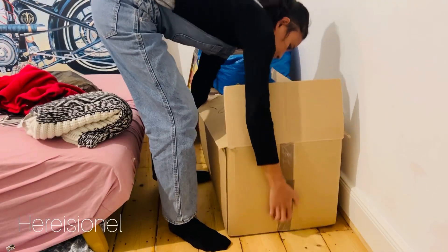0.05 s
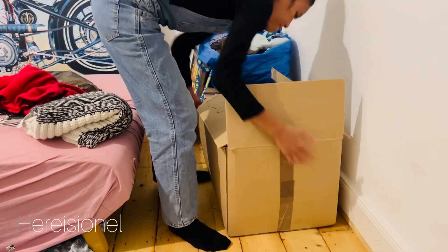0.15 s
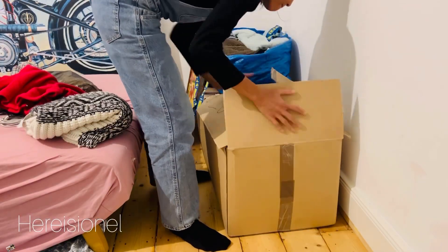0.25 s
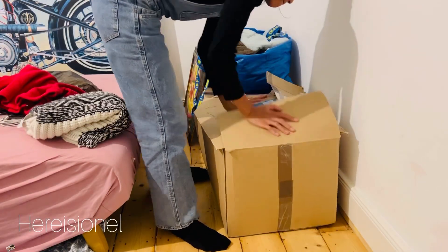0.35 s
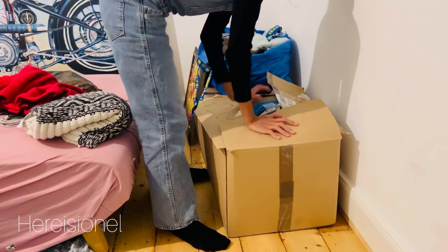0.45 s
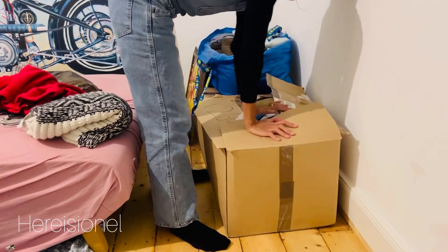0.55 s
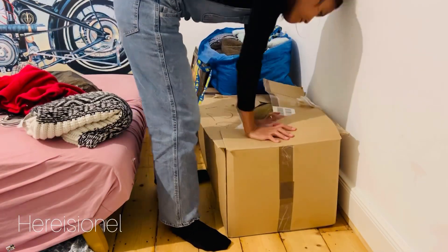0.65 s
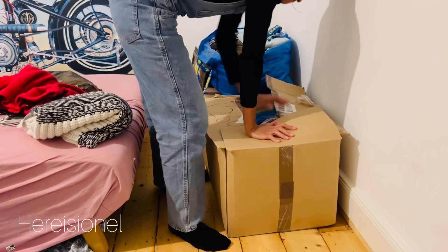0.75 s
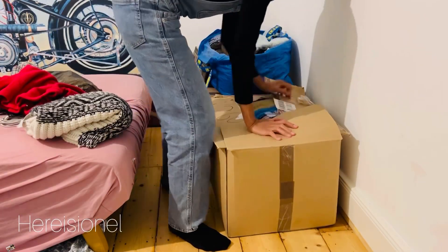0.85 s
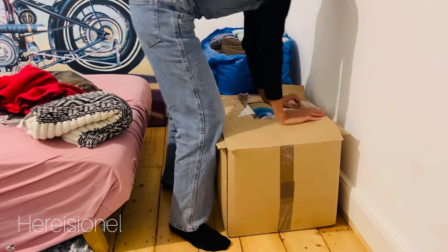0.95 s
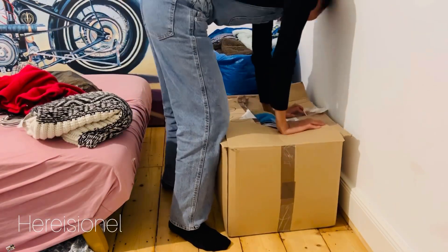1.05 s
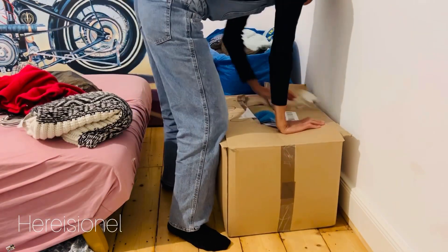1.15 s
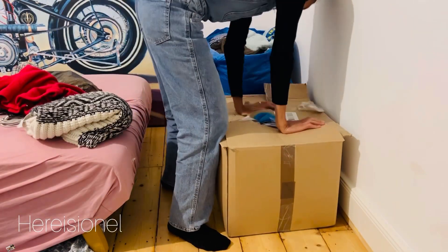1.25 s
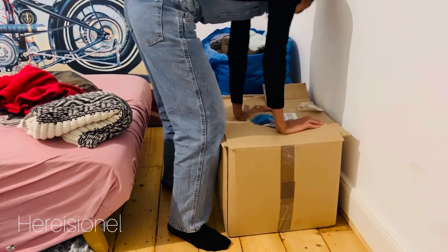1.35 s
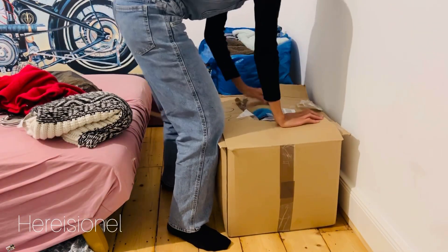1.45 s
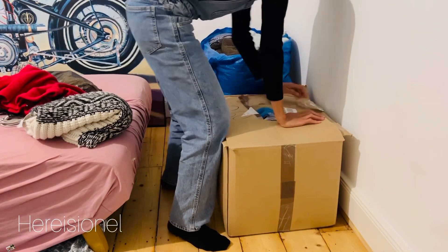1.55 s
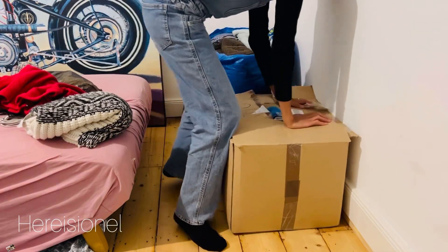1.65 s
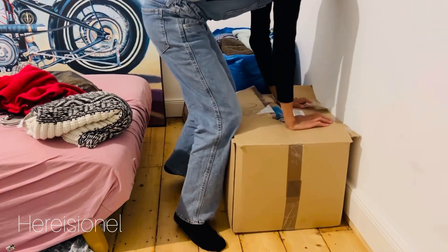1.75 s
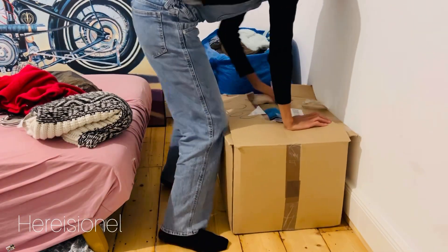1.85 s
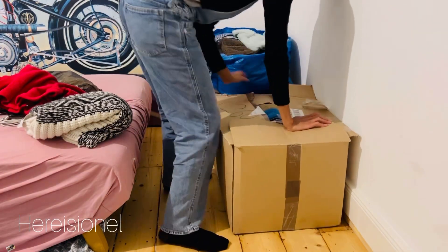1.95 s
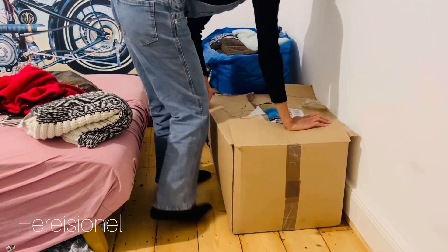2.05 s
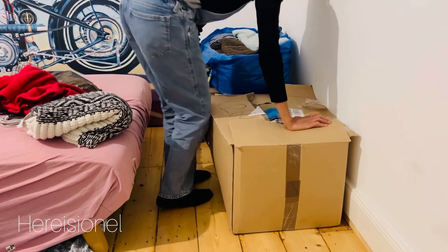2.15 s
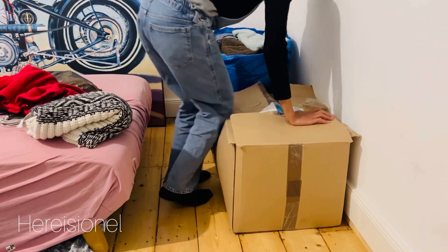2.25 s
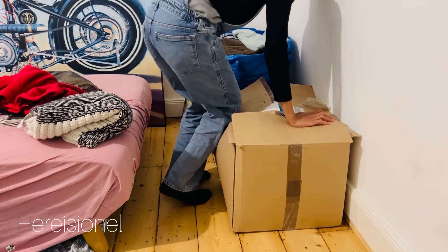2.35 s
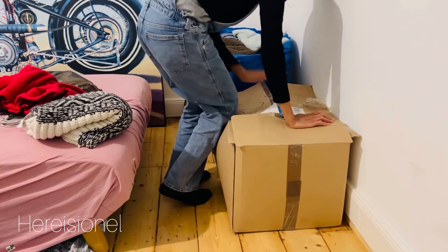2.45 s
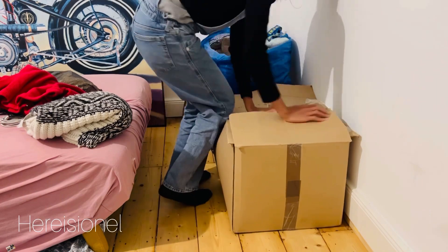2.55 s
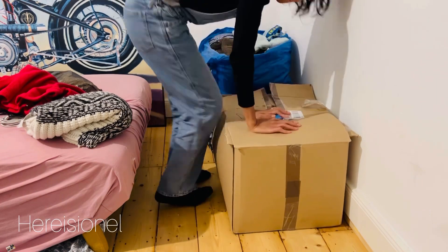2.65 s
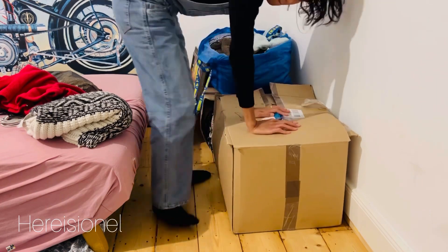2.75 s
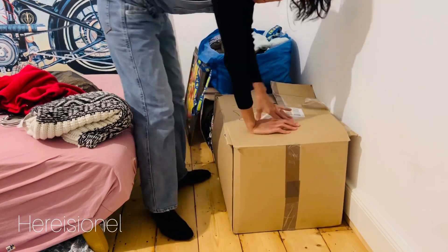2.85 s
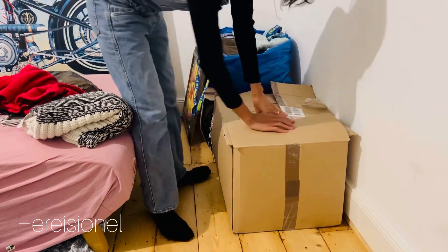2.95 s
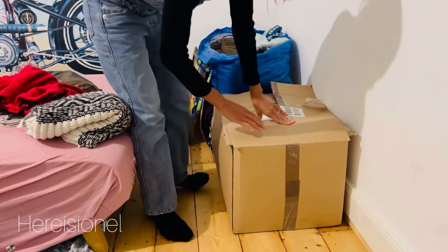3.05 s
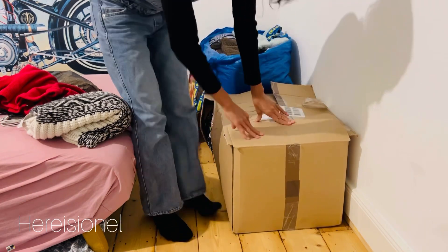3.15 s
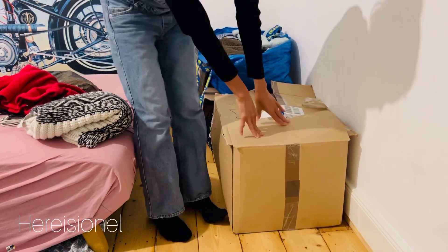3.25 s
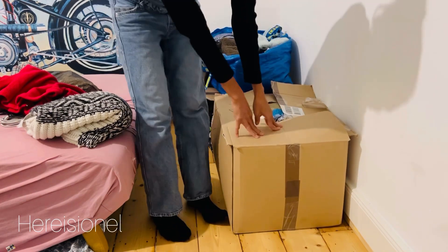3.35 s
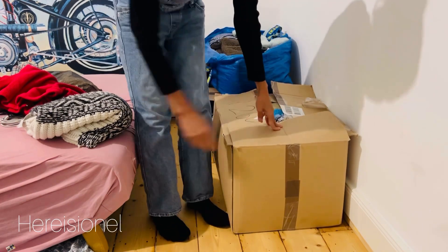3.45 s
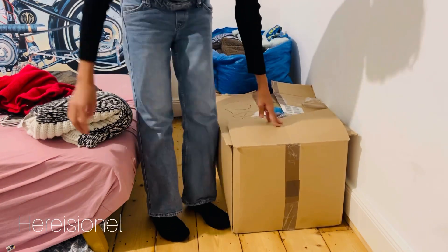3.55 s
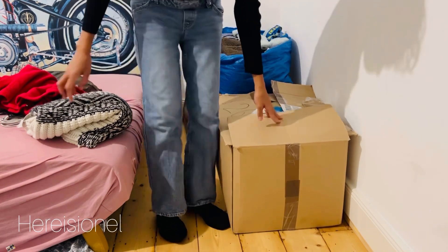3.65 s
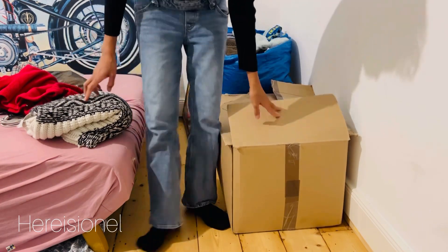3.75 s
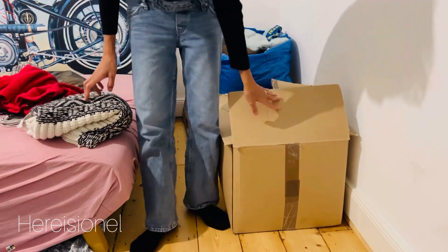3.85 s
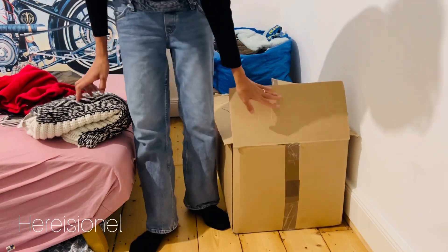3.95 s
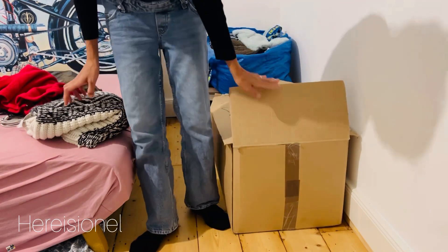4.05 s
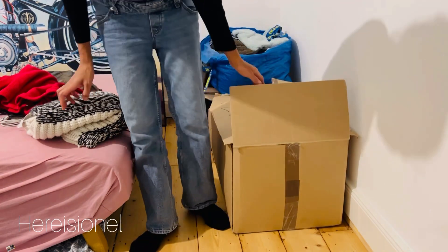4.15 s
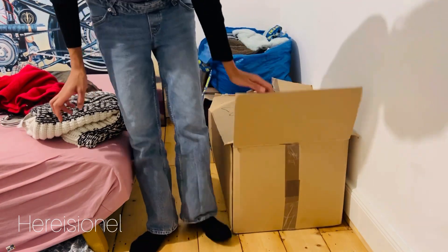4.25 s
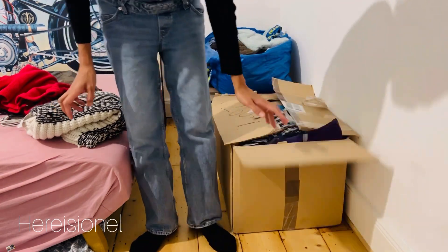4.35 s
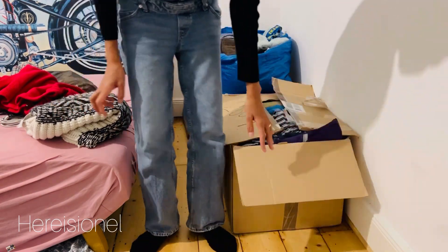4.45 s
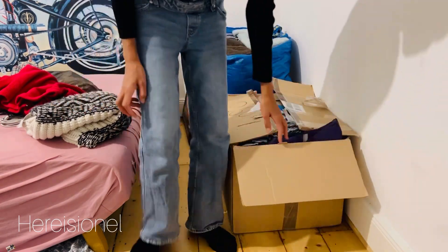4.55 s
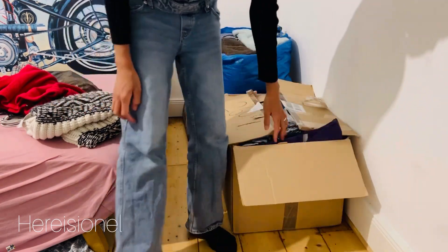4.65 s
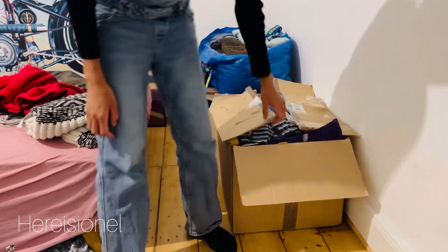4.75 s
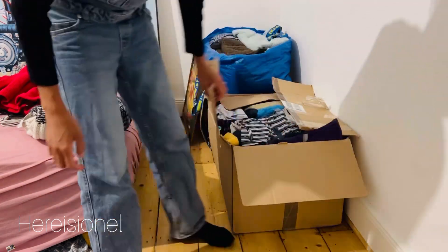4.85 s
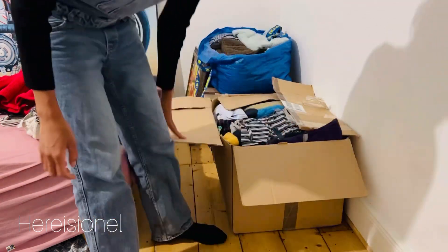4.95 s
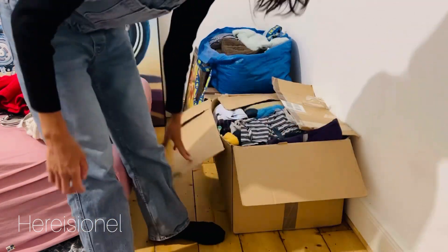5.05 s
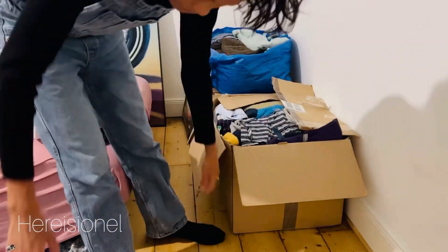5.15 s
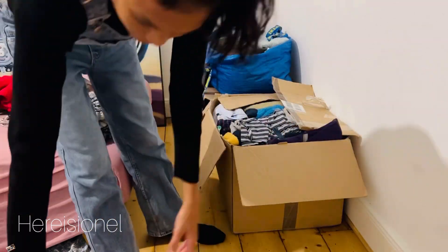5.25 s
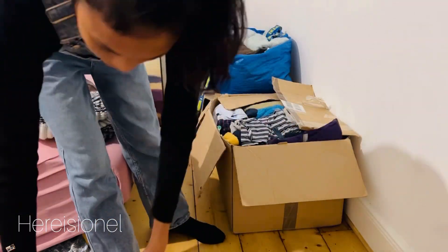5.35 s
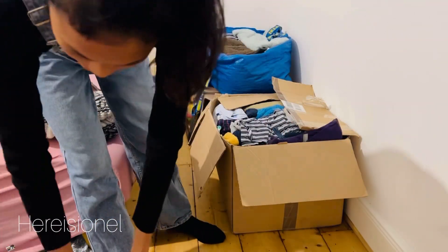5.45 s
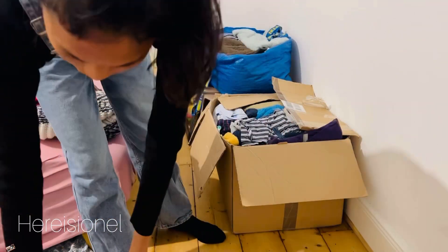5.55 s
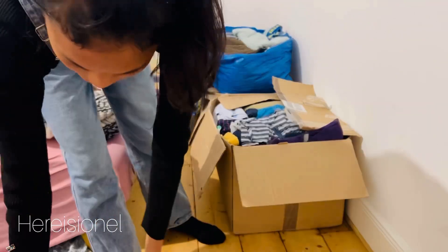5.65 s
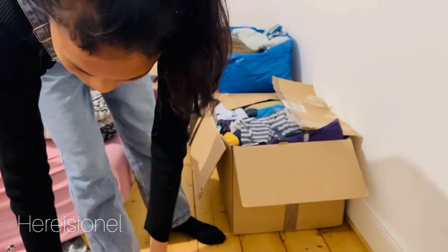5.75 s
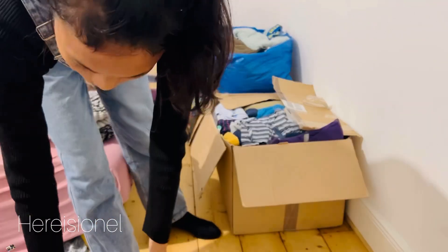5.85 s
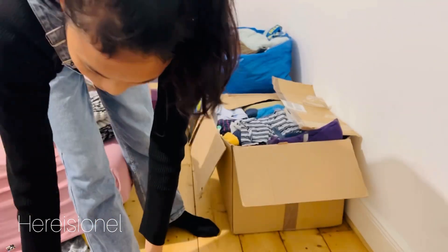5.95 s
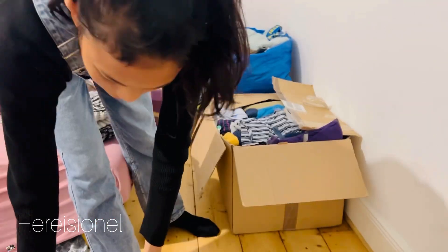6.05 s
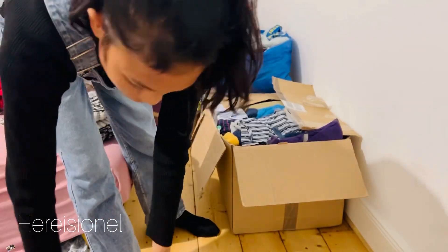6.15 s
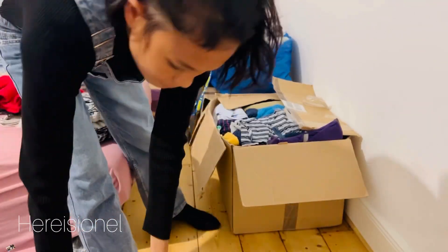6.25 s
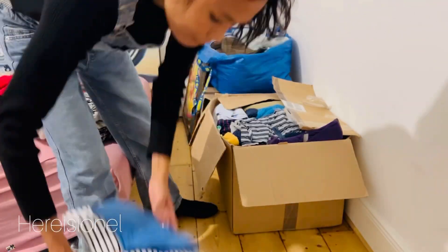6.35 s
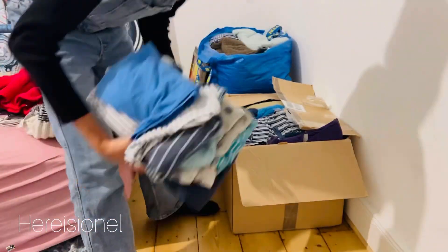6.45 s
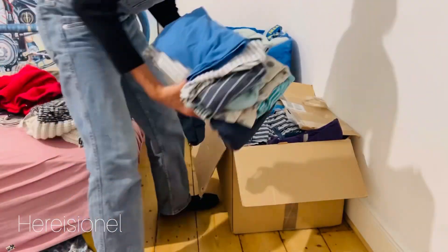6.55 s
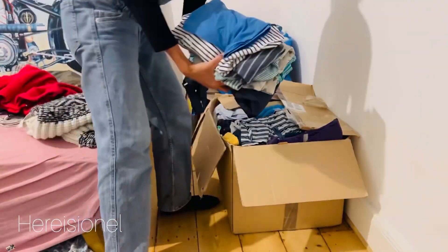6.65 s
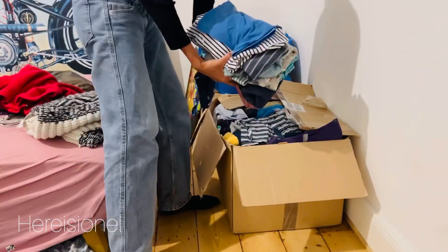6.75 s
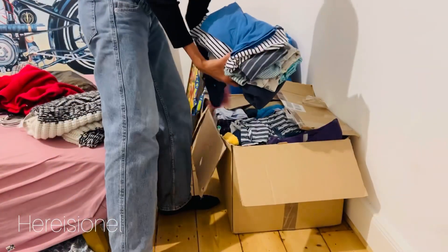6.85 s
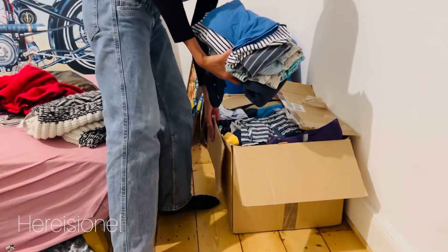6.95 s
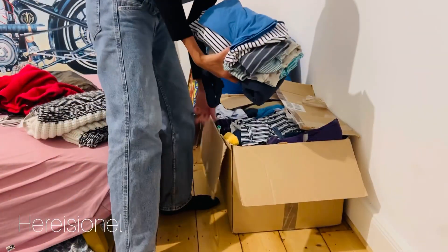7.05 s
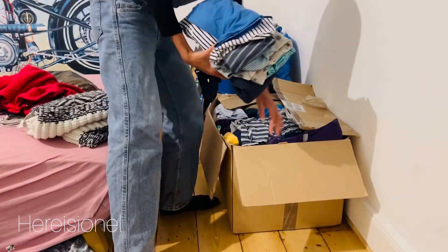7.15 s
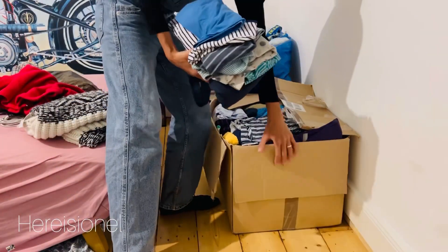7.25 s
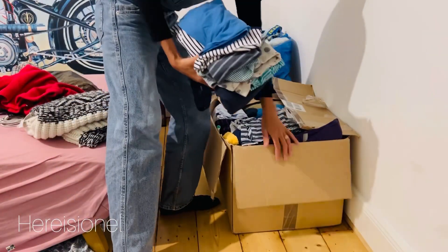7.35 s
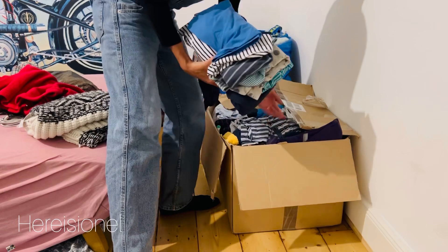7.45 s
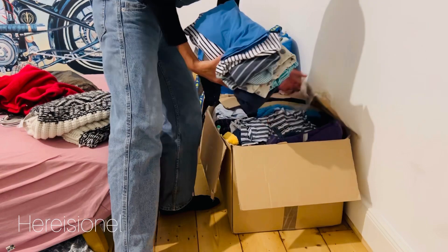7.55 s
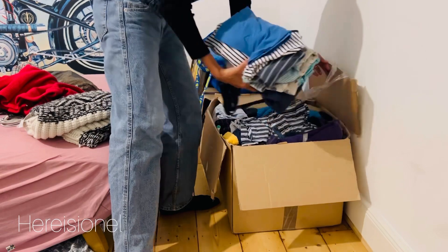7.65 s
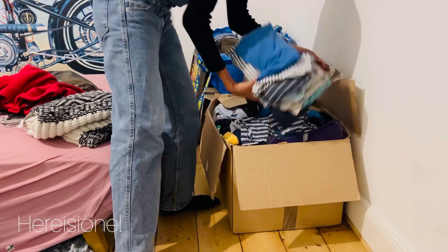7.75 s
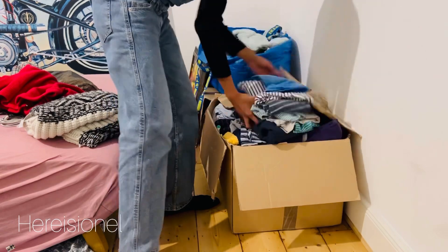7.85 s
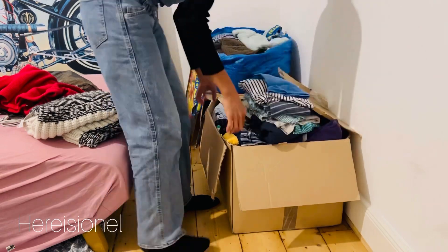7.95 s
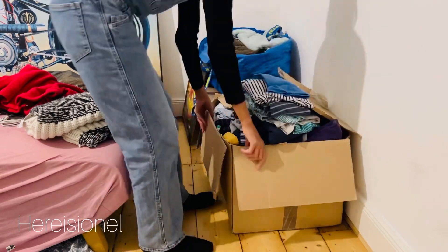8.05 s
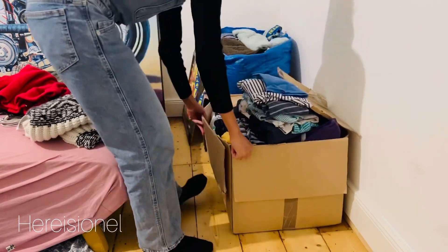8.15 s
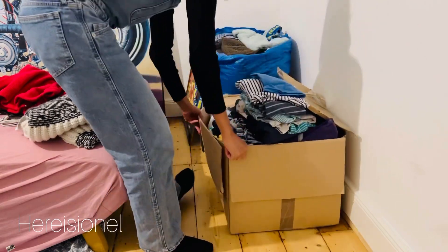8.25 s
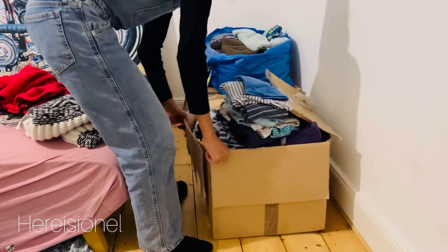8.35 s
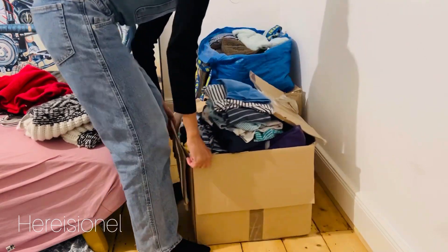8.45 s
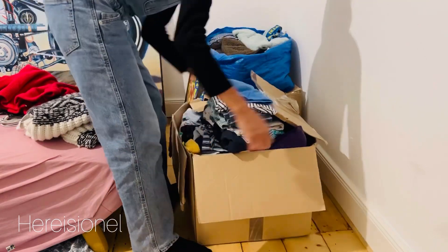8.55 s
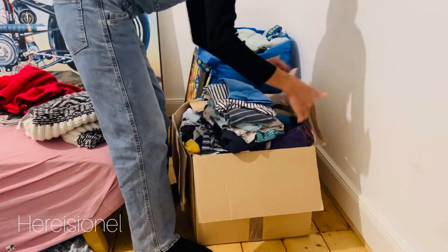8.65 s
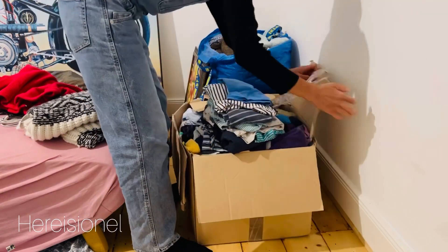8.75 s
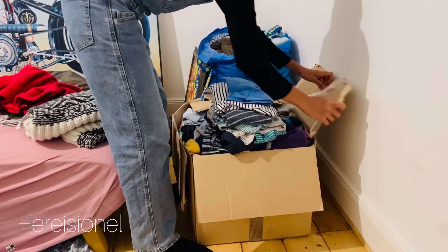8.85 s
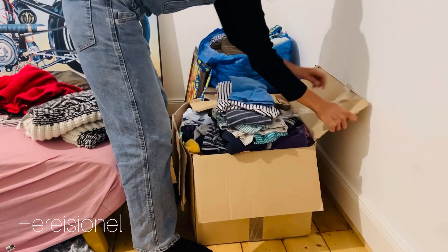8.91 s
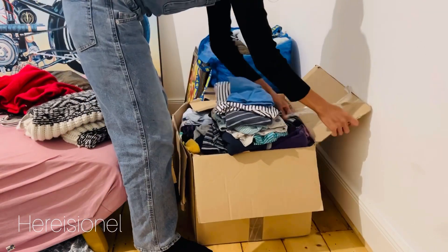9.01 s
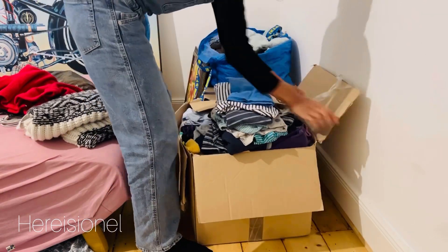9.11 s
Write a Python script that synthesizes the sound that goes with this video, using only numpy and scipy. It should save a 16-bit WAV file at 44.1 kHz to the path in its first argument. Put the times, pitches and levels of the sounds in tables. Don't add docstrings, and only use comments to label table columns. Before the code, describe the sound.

Heard close in a small, dry bedroom, hands work a stuffed cardboard box. Flap rustles and cracks lead to a cluster of firm hollow thuds, then rough scraping with a low croak and chirping squeaks. Flaps open with snaps and slaps, softer cloth movement follows, then duller knocks and renewed scraping, ending with a short bright squeal and rustle. Faint steady hiss, narrow stereo bass, wider treble.

```python
import sys
import numpy as np
from scipy import signal
from scipy.fft import rfft, irfft, next_fast_len
from scipy.io import wavfile
from scipy.ndimage import uniform_filter1d

SR = 44100
rng = np.random.default_rng(int(sys.argv[2]) if len(sys.argv) > 2 else 0)


def magnitude_from_level(level_db):
    exponent = np.asarray(level_db, float) / 20
    return 10 ** exponent


def materialize(psi):
    bounded = np.clip(np.atleast_2d(psi).T, -1, 1)
    quanta = np.round(bounded * 32767).astype(np.int16)
    wavfile.write(sys.argv[1], SR, quanta)


N = 404838


def rms_one(x):
    return x / np.sqrt(np.mean(x ** 2) + 1e-20)


def coloured(x, spectrum):
    size = next_fast_len(len(x))
    hz, level_db = np.transpose(spectrum)
    bins_hz = np.maximum(np.arange(size // 2 + 1) * SR / size, 1)
    gain = magnitude_from_level(np.interp(np.log(bins_hz), np.log(hz), level_db))
    return irfft(rfft(x, size) * gain, size)[:len(x)]


def filtered(x, order, hz, kind="low"):
    return signal.sosfilt(signal.butter(order, hz, kind, fs=SR, output="sos"), x)


def drift(rate_hz):
    r = np.exp(-2 * np.pi * rate_hz * 40 / SR)
    chance = rng.standard_normal(N // 40 + 2002)
    slow = rms_one(signal.lfilter([1], [1, -2 * r, r * r], chance)[2000:])
    return np.interp(np.arange(N) / 40, np.arange(len(slow)), slow)


def grains(per_s, spread_db, smooth):
    sizes = magnitude_from_level(spread_db * np.minimum(rng.exponential(1, N), 4)) * rng.choice([-1, 1], N)
    slips = sizes * (rng.random(N) < per_s / SR)
    return rms_one(rms_one(slips) + smooth * rng.standard_normal(N))


def fading(t, t60_s):
    return magnitude_from_level(-60 * t / t60_s)


def add(out, start_s, sound):
    i = round(start_s * SR)
    out[i:i + len(sound)] += sound[:len(out) - i]


# pitch_hz, level_db, t60_s
PANEL_MODES = [(131.5, -4.5, 0.14), (233.2, 6, 0.058), (308.2, -6, 0.11), (420, 3, 0.043), (482, 2, 0.059),
               (606, -9, 0.084), (781, 2.5, 0.038), (1040, -22, 0.039), (1390, -13, 0.034)]
# start_s, peak_db, panel_pitch_hz
PRESSES = [(0.26, -31, 490), (0.243, -35, 346), (0.379, -34, 420), (0.735, -32.5, 473), (0.843, -17, 439),
           (0.906, -15, 466), (0.924, -27, 580), (1.033, -29, 453), (1.085, -33, 493), (1.225, -31, 366),
           (1.533, -35, 475), (1.607, -27, 443), (1.688, -28.5, 400), (1.869, -31, 307),
           (1.923, -34.5, 514), (2.244, -26.5, 406), (2.866, -37, 418), (3.105, -23, 415),
           (4.223, -32.5, 205), (5.005, -35.5, 279), (6.933, -27, 310), (7.216, -30, 345),
           (8.043, -34.5, 344), (8.613, -34.5, 249)]
# start_s, peak_db, panel_pitch_hz
KNOCKS = [(0.023, -37.5, 597), (0.53, -25.5, 345), (1.049, -30.5, 470), (1.383, -36.5, 191),
          (1.694, -32, 238), (2.038, -39, 254), (2.21, -37, 400), (2.434, -39, 402), (2.505, -25, 392),
          (3.692, -38.5, 477), (4.117, -35.5, 201), (4.709, -42, 476), (4.755, -35, 477), (5.135, -36, 604),
          (5.434, -46, 363), (5.458, -24.5, 195), (6.079, -40, 485), (6.226, -42, 545), (6.671, -32, 514),
          (6.952, -26.5, 634), (7.249, -22.5, 342), (7.565, -27, 347), (8.572, -46, 300),
          (8.119, -36.5, 231), (8.686, -34.5, 338), (8.744, -39, 240)]


def thuds():
    out, t = np.zeros(N), np.arange(SR // 4) / SR
    hz, level_db, t60_s = np.transpose(PANEL_MODES)[:, :, None]
    blows = [(*row, 0.063) for row in PRESSES] + [(*row, 0.12) for row in KNOCKS]
    chance = rng.standard_normal((len(blows), len(PANEL_MODES), 1))
    for (start_s, peak_db, pitch_hz, ring_s), own in zip(blows, chance):
        cycles = pitch_hz * t
        throb = np.sin(2 * np.pi * (cycles - 0.5 * np.exp(-cycles / 0.71)))
        throb *= np.exp(-((cycles - 2.3) / 1.24) ** 2)
        near_db = -4.5 * np.abs(np.log2(hz / pitch_hz))
        near_db -= 4.9 * np.maximum(np.log2(pitch_hz / hz) - 0.9, 0)
        fall_db = -60 * t / (t60_s * ring_s / 0.072)
        modes = magnitude_from_level(level_db + near_db + 1.95 * own + fall_db) * np.sin(2 * np.pi * hz * t + own)
        box = 0.47 * modes.sum(axis=0) * (1 - np.exp(-(cycles / 2.53) ** 2))
        add(out, start_s, magnitude_from_level(peak_db) * (magnitude_from_level(0.24 * (peak_db + 17.5)) * throb + box))
    return out


# start_s, peak_db, ring_hz, treble_db
SNAPS = [(0.107, -25, 1270, -4.5), (0.383, -43, 1150, 6.5), (0.532, -44, 1260, 4.5), (0.744, -42, 1160, -1),
         (1.035, -39, 993, 1), (1.05, -31.5, 1170, -3.5), (1.536, -34, 1330, 3), (1.874, -28.5, 1490, -7),
         (2.567, -37.5, 1020, -3), (2.932, -42, 800, -6), (3.108, -34.5, 805, -13),
         (3.293, -42.5, 1060, -18), (4.159, -46.5, 855, -6), (4.256, -26, 1170, 0), (4.296, -30, 1030, -11),
         (4.753, -37, 930, -6.5), (6.934, -36, 1180, -5), (6.956, -29, 1000, -5.5), (7.246, -26, 815, -11),
         (7.34, -43.5, 980, -3), (7.567, -38.5, 846, -16), (8.748, -35, 835, -16), (8.779, -35.5, 960, 0),
         (8.874, -35.5, 1500, -2.5), (7.874, -43.5, 770, -18), (0.19, -57, 660, -11),
         (0.246, -39.5, 800, -12), (8.88, -42, 2700, -7), (1.882, -33, 800, -7), (1.169, -42, 1200, 0),
         (2.136, -48, 700, -15), (2.186, -57, 800, -15), (3.214, -52, 900, -7), (3.361, -50, 900, -10),
         (3.451, -49, 950, -5), (4.347, -50, 1100, -18), (4.925, -51, 900, -10), (5.76, -53, 600, -15),
         (5.73, -48, 1000, -10), (6.642, -49, 900, -20), (8.159, -44, 880, 1), (8.265, -53, 800, -12),
         (8.576, -45.5, 600, -13), (8.858, -52, 3470, -7), (9.153, -45.5, 1000, -15),
         (0.313, -49, 700, -10), (1.584, -42, 880, -15)]
# start_s, peak_db, ring_hz, treble_db
SLAPS = [(0.845, -38, 1160, 0), (0.907, -26, 851, -10), (1.561, -33, 1890, 2.5), (1.589, -30, 1040, -15),
         (2.246, -47, 890, -9), (2.507, -29.5, 1110, -5), (2.8, -41.5, 1550, 2), (3.592, -34.5, 1780, -1),
         (3.88, -46.5, 1090, -4), (4.37, -40, 1340, -6), (4.709, -40.5, 1150, -0.5),
         (5.001, -38.5, 930, -25), (5.133, -39.5, 1940, 6), (5.434, -34, 921, -23),
         (5.467, -35.5, 1100, -8), (5.626, -46, 1550, -11), (5.968, -54, 1230, -11),
         (6.079, -32.5, 1390, -5), (6.08, -36.5, 1880, -15), (6.088, -34, 1360, -20), (7.528, -41, 1390, 6),
         (8.203, -40.5, 890, -6.5), (8.671, -35, 1390, 1.5), (8.91, -35, 1530, -7), (8.914, -47, 2500, -10),
         (8.917, -54, 1250, -15), (2.615, -47, 885, 3.5), (2.368, -50.5, 1300, -8), (2.043, -50, 980, -18),
         (2.437, -48, 1450, 2.5), (8.092, -39.5, 1000, -16), (8.617, -53, 785, -14),
         (5.669, -50.5, 1000, -10), (9.067, -45.5, 1460, 6.5)]
# start_s, peak_db, ring_hz, treble_db
SCUFFS = [(3.688, -36, 980, -18), (6.219, -26.5, 1210, -9), (6.224, -28.5, 930, -20),
          (6.668, -32, 1220, -30), (6.669, -39.5, 1800, -25), (4.17, -41, 2400, -12),
          (5.04, -37, 1100, -10), (8.918, -38, 2500, -15), (7.7, -39, 2600, -12), (9.6, -42, 2200, -10),
          (8.685, -38, 1940, -10), (0.02, -37, 1200, -10), (3.87, -48.5, 2300, -10)]


def cracks():
    out, t = np.zeros(N), np.arange(SR // 8) / SR
    kinds = [(SNAPS, 0.069, 0.00046), (SLAPS, 0.13, 0.00046), (SCUFFS, 0.1, 0.011)]   # t60_s, rise_s
    for rows, t60_s, rise_s in kinds:
        for start_s, peak_db, ring_hz, treble_db in rows:
            breaks, spit = rng.standard_normal((2, len(t)))
            ring = [1, -2 * 0.97 * np.cos(2 * np.pi * ring_hz / SR), 0.97 ** 2]
            flap = [ring_hz / 3, min(ring_hz * 27, SR / 2 - 2000)]
            body = filtered(signal.lfilter([1], ring, breaks), 1, flap, "band")
            body = rms_one(body) * fading(t, t60_s)
            body = 2 * body / np.abs(body).max()
            top = magnitude_from_level(treble_db) * filtered(spit, 1, [1900, 7000], "band") * fading(t, t60_s)
            add(out, start_s, magnitude_from_level(peak_db - 3.5) * (body + top) * (1 - np.exp(-t / rise_s)))
    return out


# time_s, slips_per_s, level_db, tilt_db (all overtones alike, against the fundamental)
SQUEAKS = [
    [(1.45, 730, -70, 10), (1.465, 700, -56, 9), (1.487, 685, -60, -4), (1.503, 695, -54, 6),
     (1.52, 680, -57, 7), (1.53, 670, -70, 9)],
    [(1.645, 1040, -52, -2), (1.66, 960, -49, -1), (1.675, 820, -50, 3), (1.687, 740, -54, 11),
     (1.697, 650, -44, 4), (1.715, 640, -40, -7), (1.75, 655, -42, -16), (1.762, 760, -51, -20),
     (1.775, 900, -42, -25), (1.8, 1300, -46, -25), (1.812, 1350, -56, -25)],
    [(1.785, 1450, -62, -30), (1.8, 1620, -48, -30), (1.815, 1700, -62, -30)],
    [(1.79, 2050, -62, -30), (1.807, 2150, -50, -30), (1.82, 2200, -62, -30)],
    [(8.905, 1950, -55, -30), (8.911, 1940, -31, -27), (8.927, 1910, -33, -27), (8.942, 1945, -54, -22),
     (8.947, 1960, -48, -26), (8.972, 1950, -66, -36), (8.981, 1940, -50, -36), (9.025, 1930, -70, -36)],
    [(6.3, 645, -82, -25), (6.35, 655, -69, -25), (6.39, 645, -74, -25), (6.45, 638, -63, -25),
     (6.62, 622, -65, -25), (6.67, 620, -84, -25)],
]
ROUGHNESS = [.5, .7, 1, 1, .55, .25]


def squeaks():
    out, waver, beat, jitter = np.zeros(N), drift(89), drift(140), drift(300)
    for rows, rough in zip(SQUEAKS, ROUGHNESS):
        time_s, *columns = np.transpose(rows)
        at = np.arange(round(time_s[0] * SR), round(time_s[-1] * SR))
        per_s, level_db, tilt_db = [np.interp(at / SR, time_s, c) for c in columns]
        unsteady = 1 + rough * (0.022 * waver[at] + 0.03 * jitter[at])
        turn = 2 * np.pi * (np.cumsum(per_s * unsteady) / SR + rng.random())
        for k, shape_db in enumerate([0, 0, -6, -2]):
            dull_db = 0
            if k in (1, 2):
                dull_db = -60 * np.clip(np.log2((k + 1) * per_s / 2050), 0, 0.2)
            elif k == 3:
                dull_db = -40 * (per_s < 1800)
            beat_db = 3 * rough * np.roll(beat, k * 3000)[at]
            overtone_db = level_db + 4.5 + dull_db + min(k, 1) * tilt_db + shape_db + beat_db
            out[at] += magnitude_from_level(overtone_db) * np.sin((k + 1) * turn)
    return out


# peak_s, slide_s, rumble_db, scrape_db, rustle_db
JERKS = [(0.001, 0.33, -55.5, -54, -48), (0.12, 0.044, -55, -52, -41.5), (0.3, 0.15, -48, -51.5, -47.5),
         (0.41, 0.025, -62, -63, -47), (0.87, 0.074, -44.5, -54, -50), (1.592, 0.12, -69, -40, -40),
         (2.05, 0.088, -51, -55.5, -61.5), (2.25, 0.17, -48.5, -68, -55.5), (2.53, 0.32, -56, -62, -53.5),
         (4.265, 0.08, -57, -45.5, -52), (5.14, 0.043, -63, -48.5, -45.5), (5.6, 0.44, -84, -73, -67),
         (6.08, 0.04, -54, -78, -53), (6.95, 0.056, -40, -47, -60), (7.26, 0.075, -50, -54, -54),
         (7.54, 0.16, -52, -61, -49), (3.588, 0.077, -62, -54, -47), (4.372, .06, -57, -53, -53),
         (3.93, 0.019, -72, -72, -52.5), (4.587, 0.055, -66, -65, -60), (4.17, 0.043, -57, -53.5, -66),
         (7.39, 0.11, -62, -60, -49.5), (7.47, 0.041, -59, -51.5, -47), (7.805, 0.082, -51.5, -57.5, -53),
         (8.69, 0.07, -49.5, -52, -52), (8.78, .15, -53, -57, -54), (9.08, 0.25, -57.5, -59, -52)]
# middle_s, half_length_s, rumble_db, scrape_db, rustle_db
SWEEPS = [(0.67, 0.041, -55, -55, -57.5), (0.205, 0.021, -50.5, -72, -63), (0.45, 0.022, -54, -61, -49.5),
          (0.77, 0.095, -59, -64.5, -59.5), (1.815, 0.087, -52.5, -49.5, -45.5),
          (1.926, 0.0091, -60, -68, -66), (2.31, 0.048, -56, -57, -69), (2.39, .035, -70, -60, -60),
          (2.47, 0.03, -82, -62, -74), (5.31, 0.027, -69, -64.5, -75), (5.64, 0.036, -78, -62, -59),
          (5.74, 0.13, -62.5, -66, -63.5), (6.0, 0.022, -59, -63, -73), (8.28, 0.023, -47, -58, -71),
          (8.425, 0.058, -61, -45, -58), (8.635, 0.019, -58, -78, -68), (7.13, 0.026, -63, -67, -66),
          (6.86, 0.017, -73, -74, -76), (0.94, 0.079, -48, -51.5, -47), (1.065, 0.059, -44.5, -47, -52.5),
          (1.18, 0.088, -54, -66, -50), (1.38, 0.37, -58.5, -54, -58.5), (1.69, 0.13, -51, -48.5, -47),
          (1.885, 0.025, -40.5, -49, -51), (2.82, 0.32, -66.5, -62, -59.5), (3.28, 0.33, -61, -71, -63.5),
          (3.55, 0.065, -59, -60, -54.5), (3.245, 0.032, -59, -55, -54), (4.1, 0.2, -75, -69, -70),
          (4.75, 0.11, -79, -81, -62.5), (5.04, 0.096, -51.5, -55, -53), (5.462, 0.025, -34, -41, -47),
          (6.55, 0.11, -59.5, -68, -83), (7.44, 0.1, -52.5, -58.5, -53), (8.1, 0.089, -49.5, -50.5, -51),
          (8.37, 0.15, -50.5, -45.5, -48.5), (8.8, 0.11, -55, -59, -51.5), (8.92, 0.11, -56.5, -53, -53.5),
          (9.179, 0.023, -62, -51, -66)]
# rumble_db, scrape_db, rustle_db
REST_DB = [-72, -73, -67]


def strokes():
    t = np.arange(N // 40 + 1) * 40 / SR
    power = np.outer(magnitude_from_level(REST_DB) ** 2, np.ones(len(t)))
    for rows, rise, bend in [(JERKS, 0.27, 1.22), (SWEEPS, 1, 1.56)]:
        for peak_s, length_s, *levels_db in rows:
            away = np.abs(t - peak_s) / (max(length_s, 0.01) * np.where(t < peak_s, rise, 1))
            drop_db = 15 * np.minimum(away, 9) ** bend
            power += magnitude_from_level(np.array(levels_db)[:, None] - drop_db) ** 2
    return [10 * np.log10(np.interp(np.arange(N) / SR, t, p)) for p in power]


# start_s, end_s, scrape_db, rustle_db
SHOVES = [
    (1.56, 1.581, -47, -50),
    (1.873, 1.912, -37.5, -41),
    (2.205, 2.328, -57.5, -58),
    (6.219, 6.254, -49, -59),
    (7.53, 7.545, -46, -54),
    (8.367, 8.464, -52.5, -64),
]


def shoves():
    gains = np.zeros((2, N))
    for start_s, end_s, *levels_db in SHOVES:
        gains[:, round(start_s * SR):round(end_s * SR)] = magnitude_from_level(levels_db)[:, None]
    return uniform_filter1d(gains, size=200)


def corrugations(per_s, spread_db, cycles):
    slips, dealt = grains(per_s, spread_db, 0.74), rng.integers(0, 12, N)
    out, patches_db = np.zeros(N), 1.5 * drift(14)
    for k, hz in enumerate(np.geomspace(600, 6000, num=12)):
        r = np.exp(-np.log(1000) * hz / cycles / SR)
        ring = [1, -2 * r * np.cos(2 * np.pi * hz / SR), r * r]
        rung = rms_one(signal.lfilter([1], ring, slips * (dealt == k)))
        out += rung * np.sqrt(hz) * magnitude_from_level(np.roll(patches_db, k * N // 12))
    return rms_one(out)


# time_s, effort_db, fibre_brightness_db, left_right_db
GRIP = [(0.0, -57, -5, -1.5), (0.02, -52, -13.5, 0), (0.82, -63, -4, 2), (0.87, -50, -2.5, 0),
        (1.48, -62, -9.5, 2), (1.58, -43, -2.5, 0.5), (1.84, -54, -3, 1), (1.89, -39, -9, -0.5),
        (1.94, -63, 2.5, 3), (2.56, -56, -9, 1), (2.86, -60, -7, 3), (7.03, -62, -6.5, 4.0),
        (7.47, -55, -2.5, 0.5), (7.9, -64, -2.5, 3.0), (8.44, -49, -12.5, -0.5), (8.51, -66, -9, 3.5),
        (8.79, -52, -1, 0), (9.18, -60, -4.5, 2)]


def along(column):
    rows = np.array(GRIP)
    return np.interp(np.arange(N) / SR, rows[:, 0], rows[:, column])


# pitch_hz, level_db (per Hz)
RUMBLE = [(41, -59), (70, -25), (112, -6), (226, 1), (274, -5), (408, -4.5), (680, -7.5), (800, -10),
          (1040, -89), (1760, -120)]
# pitch_hz, level_db (per Hz)
SCRAPE = [(350, 3.5), (650, -5.5), (850, 5), (1800, -6), (3000, -6), (5000, -17), (9000, -36)]
# pitch_hz, level_db (per Hz)
RUSTLE = [(1760, -2.5), (3000, -3), (6710, -0.5), (7510, -2.5), (9070, -3.5), (11100, -3.5), (13200, -5.5),
          (16000, -2)]


def rubbing(flutter):
    rumble_db, scrape_db, rustle_db = strokes()
    shove_scrape, shove_rustle = shoves()
    rumble = magnitude_from_level(rumble_db + 2.1 * flutter + 0.81 * drift(6.4))
    rumble *= rms_one(coloured(grains(700, 3.5, 1.5), RUMBLE))
    scrape = (magnitude_from_level(scrape_db) + shove_scrape) * magnitude_from_level(0.6 * flutter + 1.0 * drift(30))
    scrape *= rms_one(coloured(corrugations(1100, 3.2, 15.7), SCRAPE))
    rustle = (magnitude_from_level(rustle_db) + shove_rustle) * magnitude_from_level(0.7 * flutter + 0.69 * drift(42))
    rustle *= rms_one(coloured(grains(1500, 5.5, 1.87), RUSTLE))
    brightness_db = along(column=2)
    lean_db = 1.28 * drift(3.3) + 0.41 * (brightness_db - brightness_db.mean())
    dull = filtered(rustle, 2, 7500)
    low = filtered(dull, 2, 4200)
    patch_db = 1.8 * drift(18)
    dull_part = magnitude_from_level(-lean_db) * (magnitude_from_level(patch_db) * low + magnitude_from_level(patch_db[::-1]) * (dull - low))
    bright_part = magnitude_from_level(lean_db + np.roll(patch_db, N // 3)) * (rustle - dull)
    return rumble + scrape + dull_part + bright_part


# start_s, peak_db, pitch_hz
TICKS = [(0.1064, -40, 5890), (0.396, -30, 11400), (0.5317, -42, 5630), (1.1586, -30, 6740),
         (1.534, -34, 7810), (1.5597, -27, 5100), (1.589, -19, 9500), (1.79, -29.5, 6010),
         (2.507, -29.5, 5660), (2.565, -30.5, 5060), (3.5852, -31, 6500), (4.258, -42, 5360),
         (7.678, -35.5, 6540), (4.71, -34.5, 4650), (5.1326, -28.5, 9100), (6.079, -39, 6410),
         (7.252, -28.5, 5040), (7.3846, -42, 5420), (7.531, -30.5, 7200), (7.661, -35, 9050),
         (7.797, -39, 6700), (8.671, -28, 6200), (8.7206, -32, 13500), (8.8073, -27.5, 5800),
         (8.8568, -38, 6400), (9.069, -26.5, 9420), (4.551, -49, 9000), (3.455, -47, 13000),
         (3.108, -48, 7900), (0.909, -40, 4000)]


def ticks():
    out, t = np.zeros(N), np.arange(SR // 20) / SR
    for start_s, peak_db, pitch_hz in TICKS:
        band = [pitch_hz / 1.5, min(pitch_hz * 1.5, 17000)]
        snap = filtered(rng.standard_normal(len(t)), 1, band, "band")
        add(out, start_s, magnitude_from_level(peak_db - 6.5) * snap * fading(t, 0.033))
    return out


def tail(t60_s):
    t = np.arange(SR // 4) / SR
    echo = rng.standard_normal(len(t)) * fading(t, t60_s)
    return echo / np.sqrt(np.sum(echo ** 2))


def in_room(box):
    walls = filtered(tail(t60_s=0.093), 1, 4200)
    return box + magnitude_from_level(-7.5) * signal.oaconvolve(box, walls)[:N]


# pitch_hz, level_db (per Hz)
HISS = [(15, -65), (25, -35), (43, -23), (97, 3), (180, 2.5), (818, -15.5), (911, -18), (1370, -10.5),
        (1840, -43), (3250, -11.5), (4250, -20), (6050, -6), (8590, -30.5), (14800, -36), (16000, -38)]


def hiss():
    return magnitude_from_level(-61) * rms_one(coloured(rng.standard_normal(N), HISS))


def grainy(flutter):
    return in_room(rubbing(flutter) + cracks() + ticks()) + hiss()


# pitch_hz, level_db
PORTS = [(60, -27), (110, -28), (200, -16), (380, -13), (700, -11.5), (1290, -6.5), (2380, 1), (4400, 1),
         (8120, 0), (15000, 0)]
# pitch_hz, level_db
TREBLE_LEAN = [(60, -5), (110, -0.5), (200, -2.5), (380, -0.5), (700, -2), (1290, -1.5), (2380, -2),
               (4400, 0.5), (8120, -1), (15000, -1)]


def scene():
    flutter = drift(26.6)
    ringing, grain = in_room(thuds() + squeaks()), grainy(flutter)
    late = np.imag(signal.hilbert(0.65 * ringing + 0.21 * grain, next_fast_len(N)))[:N]
    side = coloured(0.92 * grainy(flutter) - late, PORTS)
    left = coloured(ringing + grain + side, TREBLE_LEAN)
    right = ringing + grain - side
    pan_db = 0.33 * along(column=3)
    return np.array([left * magnitude_from_level(pan_db), right * magnitude_from_level(-pan_db)])


def low_pass(x):
    return signal.sosfilt(signal.butter(12, 15850, fs=SR, output="sos"), x)


def record(dry):
    mix = filtered(dry, 6, 107, "high") + magnitude_from_level(-22) * dry
    mix = signal.sosfilt(signal.cheby2(12, 70, 16900, fs=SR, output="sos"), mix)
    return low_pass(mix)


dry = scene()
out = record(dry)
materialize(out)
```